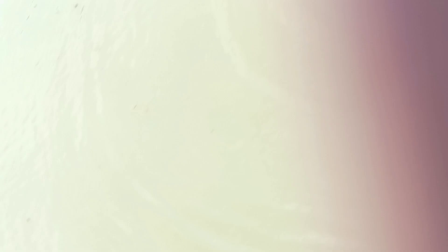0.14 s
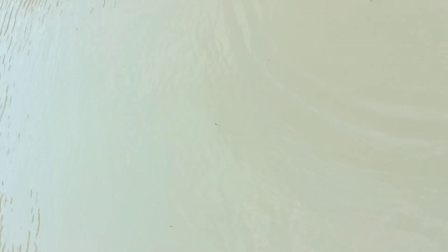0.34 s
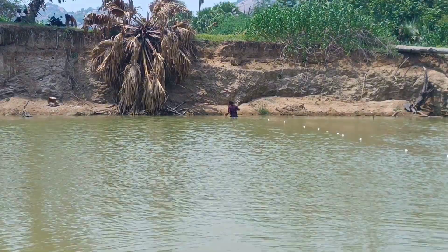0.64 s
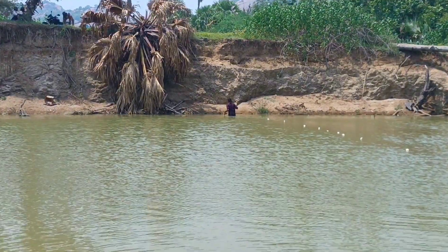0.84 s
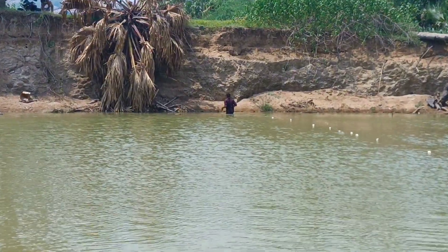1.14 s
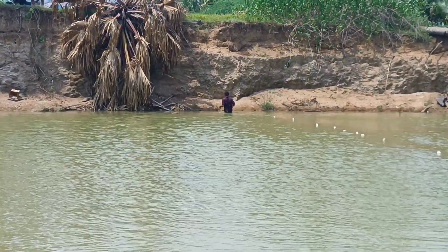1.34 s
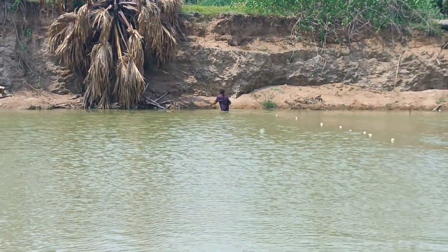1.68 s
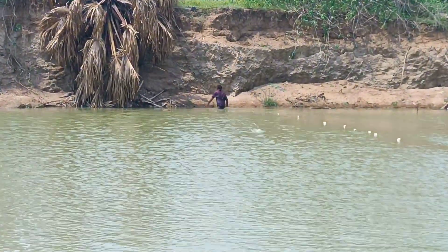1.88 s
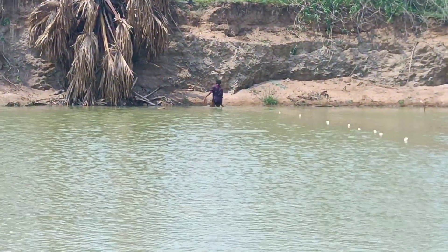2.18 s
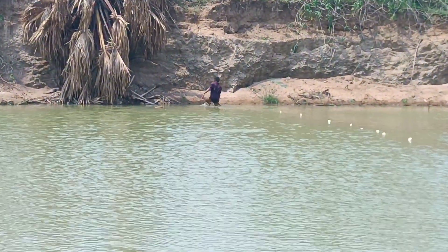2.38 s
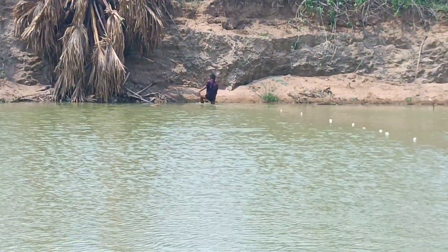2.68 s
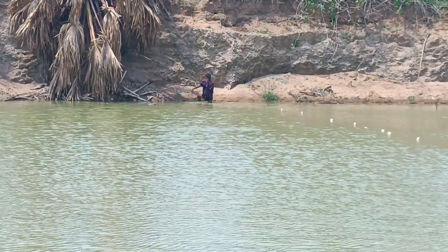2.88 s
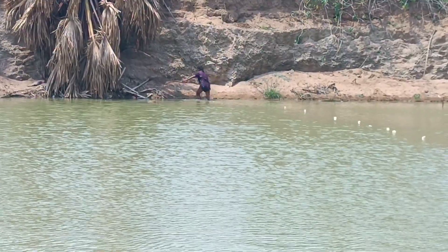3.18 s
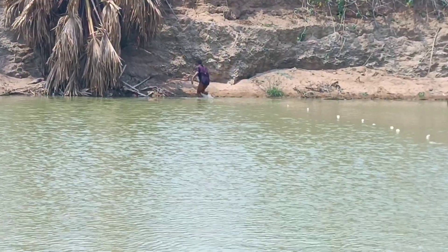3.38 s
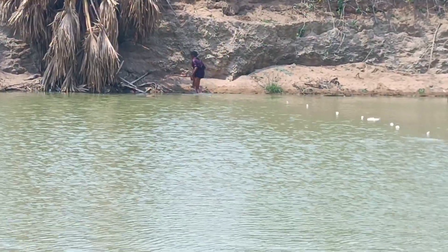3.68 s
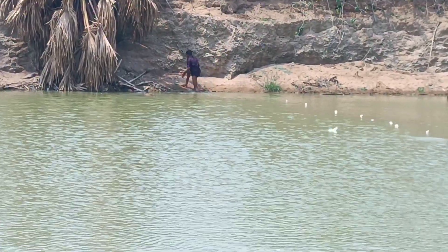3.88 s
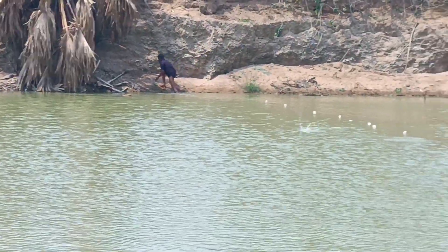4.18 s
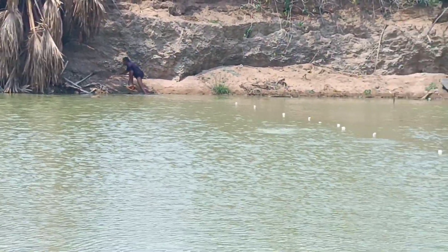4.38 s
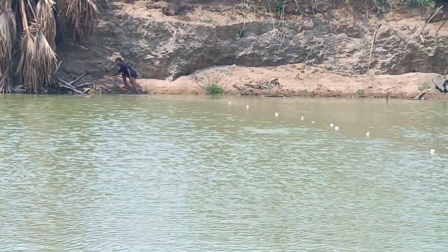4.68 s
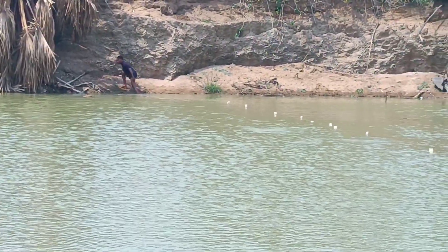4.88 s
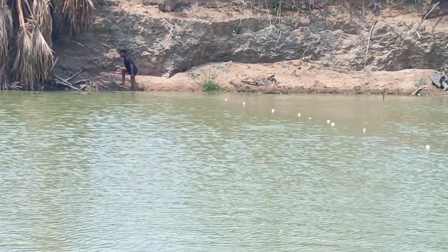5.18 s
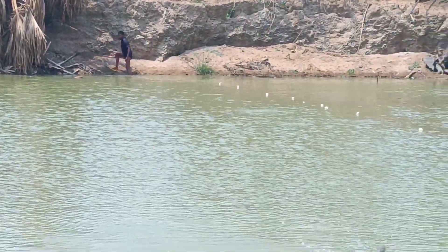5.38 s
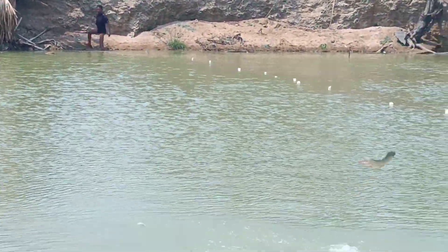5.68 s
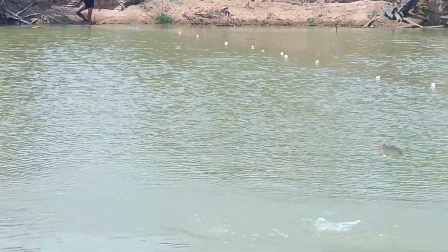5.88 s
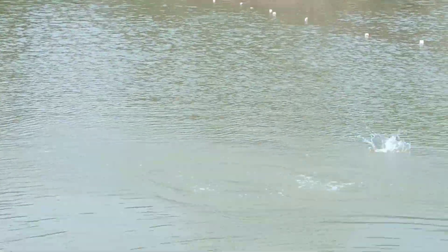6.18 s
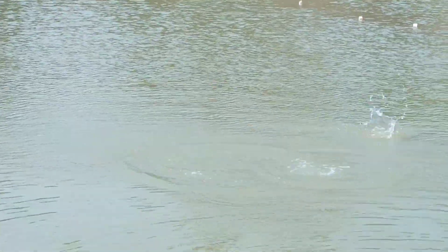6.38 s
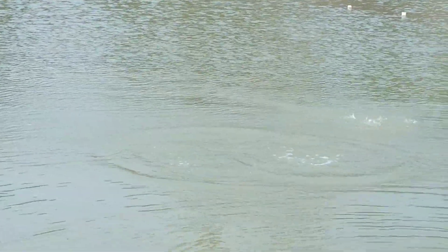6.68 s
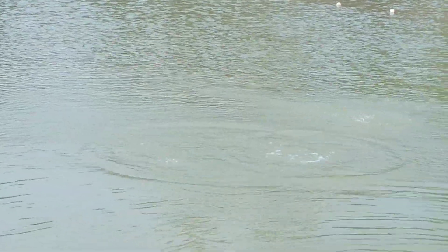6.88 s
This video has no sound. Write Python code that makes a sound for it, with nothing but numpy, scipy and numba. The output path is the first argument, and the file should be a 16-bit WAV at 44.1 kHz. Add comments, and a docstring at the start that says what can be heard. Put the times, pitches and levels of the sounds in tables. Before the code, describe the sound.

After handling knocks and a brief near-silence, cicadas hiss over lapping water while fish plop and splash and a distant engine speeds up.

```python
"""Fingers rub and tap a phone case, then the sound all but cuts out and fades back in on a splashing pond.
A fish's splashes are swarms of rising bubbles, single plops and fine spray, with an echo off the bank.
Cicadas hiss as pulsed drum resonances; a distant one-cylinder engine, a train of filtered thuds, hunts
at idle and then speeds up. Filtered noise gives the rubbing, far rustle and hiss.
The phone has two unlike microphone ports, left and right."""
import sys
import numpy as np
from scipy import signal
from scipy.fft import rfft, irfft
from scipy.io import wavfile
from scipy.ndimage import uniform_filter1d
from numba import njit

SR = 44100
rng = np.random.default_rng(int(sys.argv[2]) if len(sys.argv) > 2 else 0)


def log_audio(samples):
    """Write samples as a 16-bit WAV file to the path given in sys.argv[1]."""
    # one column per channel
    frames = np.atleast_2d(samples).T
    # limit to full scale, then quantise
    limited = np.clip(frames, -1, 1)
    pcm = np.round(limited * 32767).astype(np.int16)
    wavfile.write(sys.argv[1], SR, pcm)


N = 310281
CUT_START_S, CUT_END_S = .558, .66

# single bubbles, drips to deep gulps: (time [s], level [dB], starting pitch [Hz], length [cycles])
PLOPS = [(1.928, -40, 750, 15.6), (1.931, -34, 2380, 8), (2.268, -37, 2570, 7.4), (2.27, -31, 1722, 23),
         (2.326, -34.5, 2720, 24.4), (2.395, -46.5, 605, 13), (2.474, -38, 2296, 15.4),
         (2.582, -22.5, 2460, 20), (2.621, -28.5, 2500, 19), (2.78, -41, 1685, 23), (2.811, -37, 2470, 18),
         (2.82, -45, 1040, 16), (3.012, -44.5, 920, 30.5), (3.3, -47, 910, 23), (3.362, -37, 2137, 15.2),
         (3.916, -36, 1770, 14), (3.961, -37, 2460, 9.4), (4.077, -35, 1960, 12), (4.193, -39, 640, 13),
         (4.204, -21, 2395, 7.4), (4.238, -33.5, 2480, 12), (4.321, -38, 2520, 8), (4.336, -36.5, 321, 17),
         (4.381, -33, 327, 7.9), (4.931, -38.5, 2470, 16), (4.97, -31, 3080, 14), (4.988, -25, 2330, 9.2),
         (4.992, -41, 337, 14), (5.005, -25.5, 1220, 8.4), (5.026, -22.5, 1294, 8.5),
         (5.027, -31, 311, 6.4), (5.046, -25.5, 2780, 27), (5.047, -29, 400, 6.5), (5.163, -32, 2630, 40),
         (5.17, -40, 255, 11.6), (5.183, -33, 2030, 19), (5.254, -32.5, 2700, 14), (5.276, -28, 2850, 10),
         (5.286, -22.5, 2430, 11), (5.34, -26.5, 1674, 17), (5.363, -32.5, 1330, 14.5),
         (5.389, -27, 1600, 16), (5.411, -31, 610, 10.1), (5.442, -34, 2650, 24), (5.467, -32, 290, 10.4),
         (5.477, -22, 857, 21), (5.533, -24, 930, 17.5), (5.558, -26, 830, 14), (5.591, -28, 430, 5.7),
         (5.593, -19.5, 763, 13), (5.621, -22.5, 2670, 14), (5.685, -30, 2500, 14.6),
         (5.712, -33, 2300, 20), (6.252, -32, 1895, 22.6), (6.291, -33, 1350, 28), (6.312, -32.5, 690, 12),
         (6.313, -24, 2600, 27), (6.323, -23, 1860, 21), (6.331, -29.5, 194, 9.9), (6.332, -15, 1570, 21),
         (6.333, -19, 2630, 36), (6.342, -25.5, 260, 2.66), (6.575, -42.5, 2490, 14),
         (6.656, -37, 1192, 38.4), (6.713, -31.5, 2650, 28), (6.736, -40, 1737, 17.4),
         (7.003, -34.5, 1190, 30)]
# splashes: (start [s], end [s], small bubbles [dB], large bubbles re small [dB], fine spray re small [dB])
SPLASHES = [(1.914, 1.925, -49, -12, -27.5), (2.793, 2.814, -47, -6, -17), (3.63, 3.75, -49, -3, -17.5),
            (3.894, 3.98, -50, -16, -15), (4.178, 4.2, -39.5, -7, -12), (4.294, 4.381, -45, -1.5, -21),
            (4.954, 5.034, -33.5, -11.5, -21.5), (5.03, 5.058, -32.5, 1, -24),
            (5.077, 5.701, -45.5, -6.5, -16), (5.113, 5.206, -48.5, -5, -15), (5.246, 5.318, -42, -20, -12),
            (5.36, 5.412, -35.5, -6.5, -20), (5.444, 5.493, -41.5, 1, -19), (5.51, 5.545, -37, 1.5, -30),
            (5.578, 5.624, -31.5, -6.5, -22), (5.654, 5.687, -45.5, -17, -15),
            (5.703, 6.205, -56.5, -1, -6), (6.233, 6.28, -39.5, -12.5, -17), (6.307, 6.34, -29, -6, -25)]


def undb(db):
    """Amplitude ratio of a level in dB."""
    return 10 ** (np.asarray(db) / 20)


def unit(x):
    """Scale to rms 1."""
    return x / np.sqrt(np.mean(x ** 2))


def curves(table):
    """Each column of a time table, one value a sample."""
    s, *columns = np.transpose(table)
    return [np.interp(np.arange(N) / SR, s, c) for c in columns]


def along(points):
    """Values of (Hz, value) points at every bin of the whole-length spectrum."""
    hz, value = np.transpose(points)
    bin_hz = np.arange(N // 2 + 1) * SR / N
    return np.interp(np.log(bin_hz + 1), np.log(hz), value)


def colour(x, points):
    """Filter by (Hz, dB) points."""
    return irfft(rfft(x) * undb(along(points)), N)


def ring(x, modes):
    """Sum of two-pole resonances (Hz, width Hz, dB) of alternating sign."""
    out = 0
    for k, (hz, width_hz, db) in enumerate(modes):
        b, a = signal.iirpeak(hz, hz / width_hz, SR)
        out = out + (-1) ** k * undb(db) * signal.lfilter(b, a, x)
    return out


def walk(rate_hz):
    """Random levels held 1 / rate_hz, smoothed twice; spread near 1."""
    k = int(SR / rate_hz)
    steps = np.repeat(rng.standard_normal(N // k + 1), k)
    return 1.3 * uniform_filter1d(uniform_filter1d(steps, k), k)[:N]


def pulses(rate_hz, start=0.):
    """A unit pulse at each wrap of the phase, and the phase in turns."""
    turns = start + np.cumsum(rate_hz) / SR
    return np.diff(np.floor(turns), prepend=np.floor(start)), turns % 1


def bursts(rows, attack_s, t60_s):
    """Summed gain of (start s, end s, dB) rows: rise, hold, die away."""
    t, out = np.arange(N) / SR, np.zeros(N)
    for start, end, db in rows:
        a, b = int(start * SR), int((max(end, start) + t60_s) * SR)
        decay_db = 60 * np.clip(t[a:b] - end, 0, None) / t60_s
        rise = np.clip((t[a:b] - start) / attack_s, 0, 1)
        out[a:b] += undb(db - decay_db) * rise
    return out


@njit
def grains(n, at, size, turn, cycles, glide, swell):
    """Sine grains that swell, ring down and rise in pitch by glide octaves at half length."""
    y = np.zeros(n)
    for g in range(len(at)):
        length = int(cycles[g] * 2 * np.pi / turn[g]) + 2
        phase = 0.
        for i in range(min(length, n - at[g])):
            phase += min(turn[g] * 2 ** (glide[g] * 2 * i / length), 3.)
            u = i / (swell * length)
            y[at[g] + i] += size[g] * u * np.exp(1 - u) * (1 - i / length) * np.sin(phase)
    return y


def play(table, swell=0.11):
    """Grains from rows of (s, dB, starting Hz, cycles, octaves up at half length)."""
    s, db, hz, cycles, glide = np.transpose(table).astype(float)
    at = (s * SR).astype(np.int64)
    return grains(N, at, undb(db), 2 * np.pi * hz / SR, np.clip(cycles, 1, 80), glide, swell)


def swarm(count, lo_hz, hi_hz, cycles, scatter_db):
    """Grains at random moments and pitches, a few of them large; rms 1."""
    u = rng.random((count, 4)).T
    s = u[0] * (N - 1) / SR
    db = -scatter_db * np.log(u[2] + 1e-4)
    hz = lo_hz * (hi_hz / lo_hz) ** u[1]
    return unit(play(np.transpose([s, db, hz, cycles * (.5 + u[3]), 0.33 * u[3]])))


@njit
def svf(x, hz, width):
    """State-variable band-pass whose centre moves, gain 1 at the centre."""
    y, b, l = np.empty(len(x)), 0., 0.
    for i in range(len(x)):
        g, k = np.tan(np.pi * hz[i] / SR), width / hz[i]
        v = (b + g * (x[i] - l)) / (1 + g * (g + k))
        b, l, y[i] = 2 * v - b, l + 2 * g * v, k * v
    return y


def finger_taps():
    """Taps excite short damped tones in the case, stronger at the right port."""
    # (time [s], level before panning [dB], pitch [Hz], length [cycles])
    tap_rows = [(0.164, -11, 912, 2.7), (0.185, -28, 204, 14), (0.241, -18.5, 420, 3.14),
                (0.274, -18, 466, 4.5), (0.341, -16, 430, 4.8), (0.41, -17, 2630, 5.9),
                (0.438, -20, 286, 3.86), (0.471, -31, 234, 3.4), (0.498, -27, 274, 4),
                (0.51, -32, 210, 2.2), (0.518, -24, 412, 5.2), (0.535, -23, 390, 3.6),
                (0.554, -25, 152, 9.1)]
    return play([(*row, 0) for row in tap_rows], swell=0.112) * undb([[-14], [5]])


def finger_rubs():
    """Stick-slip noise of skin dragging near the right port rings the case in five bands."""
    # (start [s], loudest [s], end [s], low rub [dB], hollow ring [dB], bright rub [dB],
    #  scrape [dB], airy hiss [dB])
    strokes = [(0, 0.066, 0.11, -40, -46.5, -39, -39, -55), (0.096, 0.158, 0.18, -36.5, -34, -27, -43, -58),
               (0.179, 0.196, .207, -25, -36, -30.5, -46, -64.5),
               (0.275, 0.281, 0.327, -41, -28.5, -35, -38, -55.5),
               (0.297, 0.337, 0.36, -38.5, -22.5, -29.5, -37, -51),
               (.345, 0.364, 0.402, -37.5, -30.5, -30.5, -39, -47.5),
               (0.38, 0.418, 0.48, -43, -50, -39.5, -35.5, -67),
               (0.436, 0.438, 0.47, -28, -34, -29, -45, -66),
               (0.441, 0.488, .556, -36, -46, -34, -33, -49.5)]
    # one row per band: (modes applied twice: (centre [Hz], width [Hz], level [dB]), left re right [dB])
    case_bands = [([(218, 240, 0)], -13), ([(425, 58, 0), (595, 71, -7)], -17.5), ([(910, 1200, 0)], -12.5),
                  ([(2040, 1740, 0)], 8), ([(12000, 11000, 0)], 8)]
    edge_db, rest_db = -6.5, -61  # stroke ends re loudest; low rub of the hand at rest
    own, right = rng.standard_normal((2, N)) * undb(1.84 * walk(250))  # stick and slip
    # part of the right port's rub reaches the left 1.2 ms early
    skin = np.array([1.14 * own + 0.28 * np.roll(right, int(-.0012 * SR)), right])
    t = np.arange(N) / SR
    shape = [undb(np.interp(t, row[:3], [edge_db, 0, edge_db], -99, -99)) for row in strokes]
    shape = uniform_filter1d(shape, size=150)  # no stroke starts or stops at once
    band_levels_db = np.transpose(strokes)[3:]
    out = np.zeros((2, N))
    for level_db, (modes, pan_db) in zip(band_levels_db, case_bands):
        band_rest_db = rest_db + level_db.mean() - band_levels_db[0].mean()
        gain = np.sqrt(undb(level_db) ** 2 @ np.square(shape) + undb(band_rest_db) ** 2)
        pan = undb(np.array([[pan_db], [-pan_db]]) / 2)
        out += unit(ring(ring(skin, modes), modes)) * gain * pan
    return out


def fingers():
    """Taps, rubs and a low shake of the grip, until the cut."""
    # hand noise at the left port as the grip slides off it: (time [s], gain [dB])
    left_grip = [(0, -1), (.12, 2), (.3, 4), (.36, -5), (.41, -16), (.556, -23)]
    out = finger_taps() + finger_rubs()
    out[0] += unit(ring(rng.standard_normal(N), [(89.5, 47, 0)])) * undb(-44.5)  # grip shakes left port
    out[0] *= undb(curves(left_grip)[0])
    return out * (np.arange(N) / SR < CUT_START_S)


def cicadas():
    """Drums buckling in uneven pulses over a blur of far singers; each port has its own lag."""
    # (width of each filter pass [Hz], mean pulse rate [1/s], mean left lead before the port lead [samples])
    groups = [(400, 415, 2), (351, 425, 3), (630, 431, 5)]
    # mean drum pitch: (time [s], low group [Hz], middle group [Hz], high group [Hz])
    drum_pitches = [(.9, 5378, 5806, 6270), (1.4, 5150, 5750, 6600), (2.4, 5308, 5904, 6430),
                    (4.2, 5285, 5810, 6384), (6.1, 5196, 5907, 6335), (7.04, 5250, 5796, 6430)]
    # mean level before edge filter: (time [s], low group [dB], middle group [dB], high group [dB])
    group_levels = [(.9, -41, -54, -45), (1.3, -44.5, -40.5, -45.5), (1.95, -47, -46.5, -53.5),
                    (2.6, -42, -48, -47.5), (3.5, -45.5, -50, -47), (4.1, -48, -44.5, -47),
                    (4.45, -49.5, -49.5, -51), (5.4, -50.5, -46, -53), (6.15, -44, -40.5, -48.5),
                    (6.6, -46.5, -47, -49), (7.04, -50, -43, -47)]
    # (frequency [Hz], gain [dB])
    chorus_edges = [(4600, -14), (4880, -10), (5050, 0), (6750, 0), (7050, -6)]
    out = np.zeros((2, N))
    for (width_hz, rate_hz, lead), hz, db in zip(groups, curves(drum_pitches), curves(group_levels)):
        ports = 0.12 * rng.standard_normal((2, N))  # blur of far singers
        for k, own in enumerate(rng.standard_normal(3)):
            clicks = pulses(rate_hz * (1 + .02 * own + .04 * walk(150)))[0]
            clicks = clicks * undb(1.2 * rng.standard_normal(N))
            ports += [np.roll(clicks, 1 - k - int(round(lead))), clicks]
        drum_hz = hz * (1 + 0.0075 * walk(4))
        width_hz = float(width_hz)
        broad = np.array([svf(svf(x, drum_hz, width_hz), drum_hz, width_hz) for x in ports])
        strand = np.array([svf(x, drum_hz, 110.) for x in broad])  # nearest singer's drum rings longer
        out += unit(broad + 0.49 * undb(4 * walk(2)) * strand) * undb(db + 1.1 * walk(8))
    return colour(out, chorus_edges)


def engine():
    """One soft thud a firing, which returns off the bank; the tin around it rattles at each firing."""
    # (time [s], rate [firings/s])
    speed = [(0.8, 16.56), (1.3, 16.08), (2.4, 16.1), (3.9, 18.94), (4.4, 17.92), (5.0, 19.01),
             (5.8, 22.13), (7.04, 26.53)]
    # exhaust between the strong runs, then under steady load: (time [s], level [dB])
    pull = [(.8, -63.5), (2.8, -66), (3.16, -55.5), (3.5, -60), (3.85, -62.5), (4.24, -65), (4.45, -52.5),
            (4.65, -49), (5.1, -45.5), (5.7, -46), (6.1, -42.5), (7.04, -41.5)]
    # governor opens in runs of strong firings: (start [s], end [s], exhaust level [dB])
    hunt = [(.86, 1.07, -54), (1.35, 1.5, -51), (1.68, 1.8, -49.5), (2.16, 2.3, -55), (2.53, 2.68, -51),
            (2.89, 3.08, -50.5), (3.24, 3.42, -48.5), (3.57, 3.71, -48), (3.92, 4.06, -52),
            (4.28, 4.4, -51)]
    # exhaust thud spectrum: (frequency [Hz], relative level [dB])
    exhaust = [(15, -69), (30, -31.5), (50, 1), (75, 10.5), (100, 5.5), (120, 8.5), (145, -27), (300, -100)]
    # upper boom spectrum: (frequency [Hz], relative level [dB])
    boom_spectrum = [(50, -83), (105, -27), (130, 8.5), (160, 0.5), (195, -6), (250, -25.5), (340, -39),
                     (600, -100)]
    rate_hz = curves(speed)[0]
    load = np.hypot(undb(curves(pull)[0]), bursts(hunt, attack_s=0.023, t60_s=0.1))
    # boom re exhaust: weakest at the slowest idle, filling in as firings quicken
    boom_db = -2.5 - 11.5 * np.exp((rate_hz.min() - rate_hz) / 3.2)
    fired, phase = pulses(rate_hz, start=.73)
    fired = np.roll(fired, int(.012 * SR)) * undb(.8 * rng.standard_normal(N)) / np.sqrt(rate_hz)
    fired = fired + 0.413 * np.roll(fired, int(0.02091 * SR))  # return off the bank
    boom = unit(colour(np.roll(fired, int(-.004 * SR)), boom_spectrum))
    thud = unit(colour(fired, exhaust)) + boom * undb(boom_db)
    tin_modes = [(1214, 60, 0.5), (912, 79, -4.5), (700, 61, -12.0)]
    rattle = ring(np.exp(-phase / 0.74) * rng.standard_normal(N), tin_modes)
    return load * thud + load ** 0.32 * undb(-44.5) * unit(rattle)


def splash_gain(above_db):
    """Envelope of all splashes, each above_db over its small bubbles."""
    rows = [(start, end, db + up) for (start, end, db, *_), up in zip(SPLASHES, above_db)]
    return bursts(rows, attack_s=0.02, t60_s=0.173)


def bubbling():
    """Swarming bubbles over smooth noise: lapping in calm water, churn in splashes."""
    # lapping between splashes: (time [s], mean level before band trims [dB])
    lapping = [(.9, -56.5), (1.25, -60), (1.5, -58), (2.3, -60), (2.75, -53.5), (3.2, -58), (3.6, -54),
               (4.3, -52.5), (4.9, -53.5), (5.8, -50), (6.5, -46.5), (7.04, -47.5)]
    # (frequency [Hz], relative level before the tilt [dB])
    spectrum = [(120, -41), (200, -10), (306, -9), (507, -13), (746, 0.5), (1160, -4.5), (1590, -1.5),
                (2250, 1.5), (2640, 3.5), (3730, -15), (4800, -13.5), (6240, -55.5), (10600, -120)]
    calm = undb(curves(lapping)[0] + 2.5 * walk(9))
    # each small plop leaves a little fizz under its level
    fizz_rows = [(s, s + 0.0043, db - 21) for s, db, hz, _ in PLOPS if hz > 1200]
    fizz = bursts(fizz_rows, attack_s=0.0034, t60_s=0.066)
    small_gain = np.sqrt(calm ** 2 + splash_gain(np.zeros(len(SPLASHES))) ** 2 + fizz ** 2)
    large_gain = np.hypot(calm * undb(-2.5), splash_gain(np.transpose(SPLASHES)[3]))
    bubbles = swarm(count=11000, lo_hz=225.4, hi_hz=4770, cycles=18.0, scatter_db=2.5)
    wash = unit(colour(rng.standard_normal(N), [(100, -10), (10000, -20.5)]))
    # calm water laps smoothly, churned water bubbles
    distinct = np.clip((20 * np.log10(small_gain) + 67.5) / 24, .1, .9)
    mix = np.sqrt(distinct) * bubbles + np.sqrt(1 - distinct) * wash
    churn = colour(mix, [(hz, db + 10 * np.log10(hz)) for hz, db in spectrum])  # tilt 3 dB an octave
    large = colour(churn, [(1100, 0.5), (1500, -26.0)])
    small = unit(churn - large)
    return small * small_gain * undb(-4.5) + unit(large) * large_gain * undb(-4)


def plops():
    """Single bubbles ring and rise in pitch, deep ones further; a drop's tick starts each plop."""
    # clear, slowly climbing: (time [s], level [dB], starting pitch [Hz], length [cycles],
    #  glide at half length [octaves])
    chirps = [(2.745, -52.5, 270, 22, 0.28), (3.16, -54, 418, 20, .25), (3.188, -44.5, 576, 22.3, .8)]
    ringing = play([(*row, 0.049 + 39.8 / row[2]) for row in PLOPS], swell=0.11)
    impact_cycles = 2.9
    ticks = play([(s, db - 12.5, hz, impact_cycles, 0) for s, db, hz, _ in PLOPS], swell=0.29)
    return ringing + play(chirps, swell=0.4) + ticks


def bank_echo(dry):
    """Short diffuse return off the bank: decaying noise, different at each port."""
    t = np.arange(int(.15 * SR)) / SR
    bank = rng.standard_normal((2, len(t))) * np.exp(-np.log(1000) * t / 0.086)  # T60 0.086 s
    bank *= undb(-6.5) / np.sqrt(np.sum(bank ** 2, axis=1, keepdims=True))
    return signal.fftconvolve(dry[None], bank, axes=1)[:, :N]


def spray():
    """Swarms of tiny high grains: droplets landing all around, so independent at the ports."""
    # (time [s], level [dB])
    flicks = [(1.2899, -56.5), (4.1894, -59), (4.9721, -64), (5.0185, -53), (5.031, -53), (5.0624, -57),
              (5.2884, -42), (5.3632, -51), (5.6216, -48), (5.638, -42), (5.9803, -58), (6.1988, -55),
              (6.2447, -46), (6.257, -55), (6.333, -56.5)]
    attack_s, floor_db = .004, -72.5  # floor: drizzle of far droplets, before flutter
    droplets = np.array([swarm(count=25000, lo_hz=8420, hi_hz=15800, cycles=2.5, scatter_db=2.0)
                         for _ in range(2)])
    gain = np.hypot(undb(floor_db), splash_gain(np.transpose(SPLASHES)[4]))
    gain = gain * undb(2.1 * walk(30) - 2.5)
    flick_rows = [(s - attack_s / 2, s + attack_s / 2, db) for s, db in flicks]
    return droplets * (gain + bursts(flick_rows, attack_s, t60_s=0.047))


def water():
    """Bubbling and plops with their bank echo, under fine spray."""
    dry = bubbling() + plops()
    return dry + bank_echo(dry) + spray()


def air():
    """Far rustle and the phone's own hiss: shaped noise, most alike at the ports in the bass."""
    # (frequency [Hz], relative level [dB])
    air_spectrum = [(25, -54), (45, -22), (90, -1.5), (200, -14), (530, -22), (810, -25), (1500, -18),
                    (2600, -19), (3700, -24.5), (4700, -15.5), (5050, -6), (6750, -5), (7300, -17),
                    (8500, -32.5), (12000, -31), (15600, -47)]
    # (frequency [Hz], correlation between ports [0-1])
    likeness = [(60, 0.51), (700, 0.28), (1400, 0), (3000, 0), (6000, 0.089)]
    like = np.clip(along(likeness), 0, 1)
    noise = rfft(rng.standard_normal((2, N))) * undb(along(air_spectrum))
    mid, side = noise * np.sqrt([1 + like, 1 - like])
    mean_db = -45.5
    return unit(irfft(np.array([mid + side, mid - side]), N)) * undb(mean_db + .5 * walk(1.65))


def port_response(far):
    """Unlike port resonances; the left port faces the pond and hears it first."""
    # (frequency [Hz], left re right [dB])
    port_difference = [(1700, 0), (2700, -9), (3900, 0), (5200, -5.5), (6300, -14.5), (7300, -0.5),
                       (8500, 4), (11000, 11), (15000, 10.5)]
    left_lead_s = 3e-5
    bin_hz = np.arange(N // 2 + 1) * SR / N
    lead = np.exp(2j * np.pi * np.outer([1, 0], bin_hz) * left_lead_s)
    return irfft(rfft(far) * lead * undb(np.outer([.5, -.5], along(port_difference))), N)


def scene():
    """Far sounds shaded by the hand, then fading back in after the cut, plus the fingers."""
    # hand shading the ports until the cut: (time [s], left [dB], right [dB])
    shade = [(0, 5.5, -11.5), (.2, -12, -7.5), (.4, -2.5, -10), (.55, -14, -27)]
    fade_in_s, open_db = 0.23, (1.5, 1.19)  # open: left, right
    far = port_response(cicadas() + engine() + water() + air())
    t = np.arange(N) / SR
    u = np.clip((t - CUT_END_S) / fade_in_s, 0, 1)
    back = np.outer(undb(open_db), np.sin(np.pi / 2 * u) ** 1.666)
    gain = np.where(t < CUT_START_S, undb(curves(shade)), back + undb(-59))
    return far * gain + fingers()


def record(dry):
    """A further 22 dB dip during the cut, then a steep low-pass."""
    t = np.arange(N) / SR
    gate = np.where((t > CUT_START_S) & (t < CUT_END_S), undb(-22.0), 1)
    top_hz = 15630
    low_pass = signal.ellip(10, .2, 80, top_hz, fs=SR, output="sos")
    return signal.sosfilt(low_pass, dry * gate)


dry = scene()
out = record(dry)
log_audio(out)
```